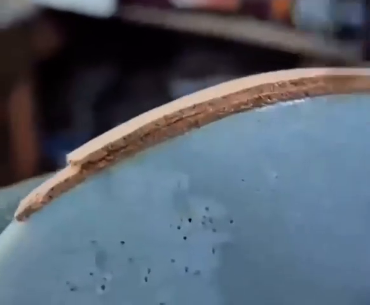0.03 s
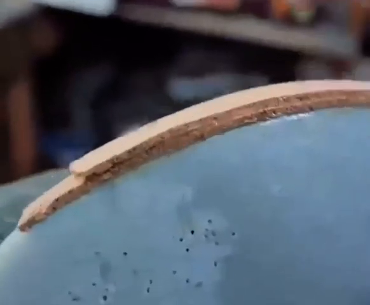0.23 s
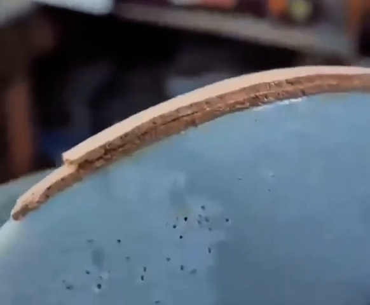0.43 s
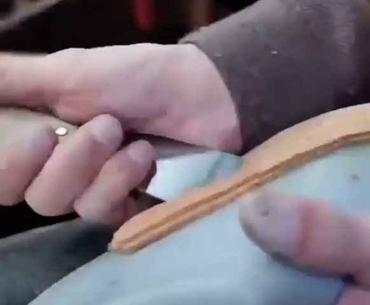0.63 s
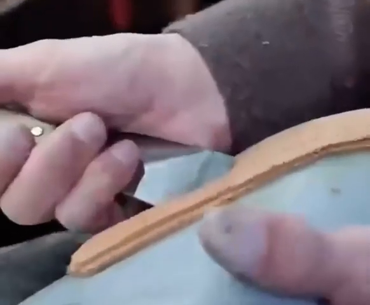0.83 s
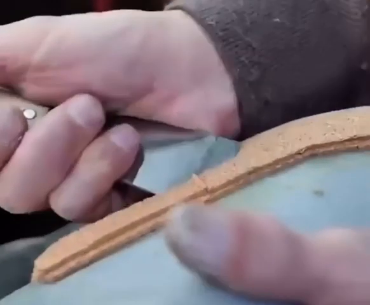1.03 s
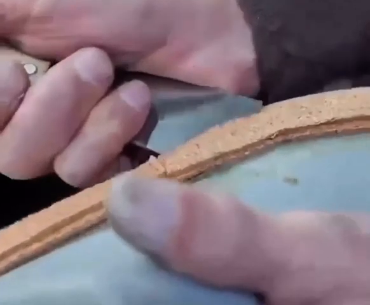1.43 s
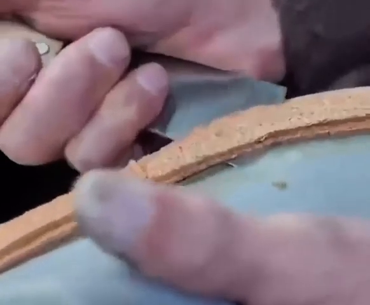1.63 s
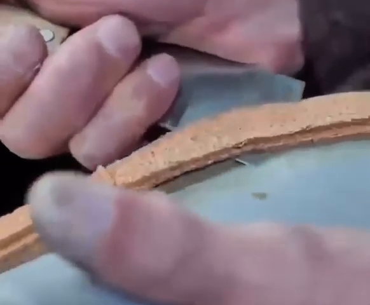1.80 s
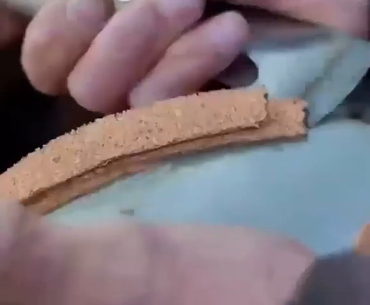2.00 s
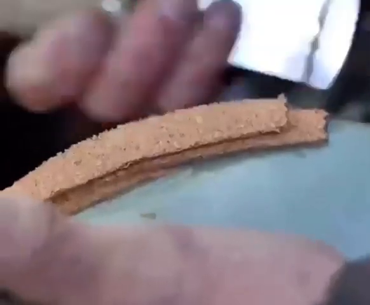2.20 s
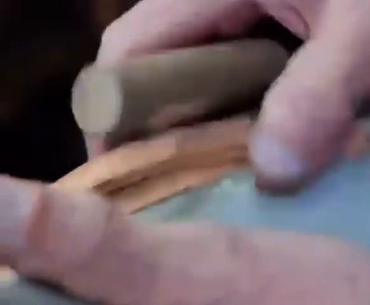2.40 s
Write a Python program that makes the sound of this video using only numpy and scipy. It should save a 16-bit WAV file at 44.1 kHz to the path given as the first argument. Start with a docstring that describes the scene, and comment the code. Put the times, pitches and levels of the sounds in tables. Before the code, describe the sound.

A hammer thuds twice on a cork strip glued to a plastic shoe form. A knife then crunches softly through the strip in uneven pushes, and the offcut peels away and snaps, close up in a small workshop.

```python
"""Hammering and trimming a strip on a shoe form

Two close hammer blows excite the damped modes of a plastic shoe form with a strip glued to it.
A knife crunches through the strip in uneven pushes, each tiny fracture ringing blade and strip, and
slips out; the offcut peels away and snaps. In the small workshop a low hum wavers over quiet noise."""
import sys
import numpy as np
from scipy import signal
from scipy.fft import rfft, irfft
from scipy.io import wavfile
from scipy.ndimage import uniform_filter1d

SR = 44100
rng = np.random.default_rng(int(sys.argv[2]) if len(sys.argv) > 2 else 0)


def file_out(sig):
    """Save sig as 16-bit WAV at sys.argv[1]."""
    # one column per channel
    cols = np.atleast_2d(sig).T
    # limit, then scale
    lim = np.clip(cols, -1, 1)
    pcm = np.round(lim * 32767).astype(np.int16)
    wavfile.write(sys.argv[1], SR, pcm)


N = 112454


def amp(db):
    """Amplitude ratio of a level in decibels."""
    return 10 ** (np.asarray(db) / 20)


def unit(x):
    """Normalisation to an rms of 1."""
    return x / np.sqrt(np.mean(x ** 2))


def clock():
    """Time of each sample in seconds."""
    return np.arange(N) / SR


def curve(rows):
    """Amplitude envelope through (s, dB) points, silent outside them."""
    s, db = np.array(rows).T
    return amp(np.interp(clock(), s, db, left=-120, right=-120))


def fade(start, t60):
    """Free decay: a sudden onset, then a fall of 60 dB every t60 seconds."""
    age = clock() - start
    return (age >= 0) * np.exp(-np.log(1000) * np.maximum(age, 0) / t60)


def colour(x, points):
    """Minimum-phase filter through (Hz, dB) points that conserves the power of white noise."""
    hz, db = np.array(points).T
    log_hz = np.log(np.fft.rfftfreq(2 * N, 1 / SR) + 1)
    log_gain = np.log(amp(np.interp(log_hz, np.log(hz), db)))
    cepstrum = irfft(log_gain)[:N]
    cepstrum[1:] *= 2
    response = np.exp(rfft(cepstrum, 2 * N))
    rms_gain = np.sqrt(np.mean(abs(response) ** 2))
    return irfft(rfft(x, 2 * N) * response / rms_gain)[:N]


def band(x, hz, width):
    """Two identical resonators in cascade, for steep skirts."""
    b, a = signal.iirpeak(min(hz, .45 * SR), hz / width, fs=SR)
    return signal.lfilter(b, a, signal.lfilter(b, a, x + 1e-18))


def ring(x, peaks):
    """Parallel resonances (centre Hz, width Hz, dB) that conserve the power of white noise."""
    impulse = signal.unit_impulse(2048)
    response = sum(amp(db) * band(impulse, hz, width) for hz, width, db in peaks)
    return signal.fftconvolve(x, response / np.linalg.norm(response))[:N]


def walk(rate_hz):
    """Slow random fluctuation: low-passed noise with an rms of 1."""
    span = int(SR / rate_hz)
    return unit(uniform_filter1d(uniform_filter1d(rng.standard_normal(N), span), span))


def grains(per_s, spread_db):
    """Tiny fractures as a Poisson process of impulses, mostly small, a few large."""
    hit = rng.random(N) < per_s / SR
    size = amp(spread_db * np.minimum(rng.exponential(size=N), 5))
    return unit(hit * size * rng.choice([-1, 1], N))


def burst(start, t60, click_db=10.5):
    """Broadband excitation: an impulse with a decaying tail of noise."""
    click = np.arange(N) == int(start * SR)
    return amp(click_db) * click + fade(start, t60) * rng.standard_normal(N)


def hammer():
    """Impact excitation: the form thuds in its damped modes, and the steel face cracks on contact."""
    # Each row: start in seconds, thud level in dB, crack level in dB, crack centre in Hz.
    blows = [(.2148, 1.5, -16.5, 6960), (.482, 2.4, -13, 4020)]
    # Modes of the form. Each row: frequency in Hz, level in dB, t60 in seconds.
    form_modes = [(131, 12.5, 0.012), (234.4, 13, 0.016), (332.3, 13.5, .015), (396.3, 7, 0.023),
                  (566.3, 10, .01), (740, -15.5, 0.038), (806, -33, 0.1), (945, -27.5, .055),
                  (1357, -19.5, 0.029), (1603, -12, 0.022), (2357, -8, 0.0088)]
    rise_s, crack_lead_s, crack_width_hz = 0.0022, .0002, 5000
    t, out = clock(), 0
    for start, db, crack_db, crack_hz in blows:
        push = 1 - np.exp(-np.maximum(t - start, 0) / rise_s)
        thud = sum(amp(mode_db) * fade(start, t60) * np.sin(2 * np.pi * hz * (t - start))
                   for hz, mode_db, t60 in form_modes)
        crack = ring(burst(start - crack_lead_s, t60=0.012), [(crack_hz, crack_width_hz, 0)])
        out = out + amp(db) * push * thud + amp(crack_db) * crack
    return out


def knife():
    """Fracture and friction: breaking grains ring the juddering blade and the strip; the flank hisses."""
    # Envelopes of crunch, lower ring and hiss. Each row: time in seconds, level in dB.
    crunch_levels = [(0.55, -80), (0.568, -58), (0.594, -53.5), (0.608, -50.5), (0.638, -57.5),
                     (0.808, -51), (0.986, -57), (1.034, -66), (1.132, -54), (1.25, -59.5), (1.26, -58),
                     (1.358, -63.5), (1.372, -55), (1.558, -47), (1.574, -57.5), (1.702, -59), (1.726, -47),
                     (1.74, -52.5), (1.936, -59), (1.946, -48.5), (1.996, -74), (2.054, -57.5),
                     (2.196, -69), (2.21, -65), (2.236, -82), (2.31, -86)]
    low_levels = [(0.55, -65), (0.936, -59.5), (1.05, -66.5), (1.128, -59.5), (1.368, -67), (1.446, -50),
                  (1.692, -63), (1.726, -50), (1.868, -60.5), (1.96, -49), (2.03, -88), (2.044, -54),
                  (2.182, -91), (2.31, -76.5)]
    hiss_levels = [(0.55, -70), (0.588, -54.5), (0.98, -59.5), (1.014, -67), (1.088, -66), (1.112, -56),
                   (1.318, -64), (1.358, -83), (1.372, -60), (1.524, -54), (1.578, -62.5), (1.696, -60),
                   (1.716, -54), (1.932, -60.5), (1.952, -44), (2.0, -76), (2.128, -62.5), (2.192, -72),
                   (2.21, -66), (2.31, -86)]
    # Hard spots give way. Each row: start in seconds, ring in dB, hiss in dB, t60 in seconds.
    catches = [(0.802, -51, -48.5, 0.021), (.9075, -44, -55.5, 0.025), (.944, -43.5, -55, 0.04),
               (1.26, -47.5, -60, 0.047), (1.375, -40, -65, 0.0067), (1.513, -41.5, -43.5, .02),
               (1.541, -36.5, -42, 0.012), (1.723, -43.5, -60, 0.014), (1.9458, -36, -38, 0.0047),
               (1.952, -55, -41, 0.0077), (2.208, -54.5, -69.5, 0.028)]
    # Resonances of blade and strip. Each row: centre in Hz, width in Hz, level in dB.
    shallow_peaks = [(2370, 340, -0.5), (2837, 600, 8.5), (3067, 380, -1.5), (3290, 460, -10),
                     (4020, 360, -10)]
    deep_peaks = [(2590, 460, -9), (2800, 650, 1), (3107, 1000, -6.5), (3410, 130, -10), (3820, 470, -11)]
    low_peaks = [(422, 510, -2), (780, 1300, -16.5), (1375, 258, 4), (1510, 120, -14)]
    # Spectrum of the hiss. Each row: frequency in Hz, spectral density in dB.
    hiss_spectrum = [(1500, 3), (3500, 2), (5200, 9), (6200, 6.5), (7300, 12.5), (8200, 9.5), (9200, 11),
                     (10400, 7), (11200, 7), (13500, 3), (15500, -1)]
    judder_db, sheen_hz, sheen_width_hz = 2.3, 10300, 680
    sink_start_s, sink_time_s = 0.96, 0.41
    judder = unit(amp(judder_db * walk(rate_hz=52)))
    fractures = grains(per_s=3100, spread_db=3.5) * judder
    crunch = amp(-1.5) * curve(crunch_levels) * fractures
    low = amp(-0.5) * curve(low_levels) * fractures
    hiss = amp(-1.5) * curve(hiss_levels) * grains(per_s=9000, spread_db=3) * np.sqrt(judder)
    for start, ring_db, hiss_db, t60 in catches:
        tick = burst(start, t60)
        crunch += amp(ring_db) * tick
        low += amp(ring_db - 4.5) * tick
        hiss += amp(hiss_db) * tick
    # As the blade sinks in, its resonances shift and it loses its bright sheen.
    depth = np.clip((clock() - sink_start_s) / sink_time_s, 0, 1)
    sheen = amp(-13) * ring(hiss, [(sheen_hz, sheen_width_hz, 0)])
    shallow = np.sqrt(1 - depth) * (ring(crunch, shallow_peaks) + sheen)
    deep = np.sqrt(depth) * ring(crunch, deep_peaks)
    return shallow + deep + ring(low, low_peaks) + colour(hiss, hiss_spectrum)


def offcut():
    """Failure under tension: the strip rasps as it peels, squeaks as it stretches, and its fibres snap."""
    # Envelopes of rasp and squeak, and the single snaps. Each row: time in seconds, level in dB.
    rasp_levels = [(2.315, -74.5), (2.329, -47), (2.355, -49.5), (2.375, -55), (2.427, -46.5),
                   (2.455, -34.5), (2.479, -51), (2.517, -59), (2.55, -67)]
    squeak_levels = [(2.42, -60), (2.436, -65), (2.44, -37.5), (2.449, -38), (2.456, -64), (2.47, -59)]
    fibre_snaps = [(2.4534, -17.5), (2.4552, -32), (2.4578, -20.5)]
    # Spectra of rasp and snap. Each row: frequency in Hz, spectral density in dB.
    rasp_spectrum = [(200, -4), (600, 1), (1000, 1), (1500, 7.5), (2100, -3), (3200, 6.5), (4200, -3),
                     (5200, 0), (6500, -3), (8700, 0), (10500, -8), (15000, -10)]
    snap_spectrum = [(150, -17), (450, 1), (900, 7), (1100, 2), (1400, 18), (2100, -4), (3100, 10),
                     (4000, -13), (5200, -27), (9000, -41), (15000, -37)]
    # Resonances of the stretched strip. Each row: centre in Hz, width in Hz, level in dB.
    strip_peaks = [(1370, 140, 0), (1610, 170, 4.5), (3470, 250, 7), (4900, 750, -6), (8820, 170, 2.5)]
    rasp = amp(-2) * curve(rasp_levels) * grains(per_s=7500, spread_db=2.6)
    squeak = curve(squeak_levels) * ring(rng.standard_normal(N), strip_peaks)
    snaps = sum(amp(db) * burst(start, t60=0.01) for start, db in fibre_snaps)
    return colour(rasp, rasp_spectrum) + squeak + colour(snaps, snap_spectrum)


def handling():
    """Contact noise: hand and knife knock on the form, it rumbles when pushed, and an arm rustles."""
    # Single knocks, and envelopes of rumble and rustle. Each row: time in seconds, level in dB.
    contacts = [(1.9068, -36), (2.0465, -35), (2.3315, -45), (2.4652, -30.5), (2.5055, -37)]
    rumble_levels = [(.55, -45), (.62, -35), (.74, -41), (.85, -41.5), (1.1, -44.5), (1.3, -41.5),
                     (1.7, -46), (1.85, -36.5), (1.95, -43)]
    rustle_levels = [(0, -53.5), (.06, -61), (.13, -66), (.2, -69), (.3, -62.5), (.42, -75), (.55, -82)]
    # Spectrum of a knock. Each row: frequency in Hz, spectral density in dB.
    knock_spectrum = [(100, 3.5), (400, 4), (750, 5.5), (1300, -11), (2000, -12.5), (3000, -14),
                      (5000, -23), (10000, -24.5), (15000, -39)]
    rustle_hz, rustle_width_hz = 3150, 4200
    knocks = sum(amp(db) * burst(start, t60=0.016) for start, db in contacts)
    rumble = curve(rumble_levels) * unit(band(rng.standard_normal(N), hz=47.5, width=44.5))
    rustle = curve(rustle_levels) * ring(rng.standard_normal(N), [(rustle_hz, rustle_width_hz, 0)])
    return colour(knocks, knock_spectrum) + rumble + rustle


def room(x):
    """Reverberation: the diffuse field of the workshop builds up, then decays at a rate set by octave."""
    # Each row: band centre in Hz, level in dB, t60 in seconds.
    octaves = [(103, -20.5, 0.14), (237, -16, 0.2), (488, -19, .18), (990, -19.5, 0.18), (2040, -18, 0.091),
               (3770, -15.5, 0.086), (6700, -18, 0.098), (12000, -23, 0.028)]
    delay_s, build_s = 0.0036, 0.004
    age = np.maximum(clock() - delay_s, 0)
    tail = 0
    for hz, db, t60 in octaves:
        edges = [hz / np.sqrt(2), min(hz * np.sqrt(2), .45 * SR)]
        bandpass = signal.butter(3, edges, "band", fs=SR, output="sos")
        noise = signal.sosfilt(bandpass, rng.standard_normal(N))
        envelope = fade(delay_s, t60) * (1 - np.exp(-age / build_s))
        tail = tail + amp(db) * noise * envelope / np.linalg.norm(envelope)
    return signal.fftconvolve(x, tail)[:N]


def lingering_ring(hz=281, width_hz=259):
    """Reverberant decay: at the start the room still rings from an earlier blow."""
    return amp(-31.5) * ring(burst(0, t60=0.15), [(hz, width_hz, 0)])


def hum():
    """A low tone modulated in frequency and amplitude, with a faint band of noise above it."""
    # Each row: time in seconds, frequency in Hz.
    pitches = [(0, 88.5), (.45, 86.5), (.62, 76), (.84, 71), (.96, 98.5), (1.07, 84.5), (1.22, 91),
               (1.32, 70.5), (1.42, 86), (1.5, 78), (1.6, 95.5), (1.73, 84), (1.81, 68), (1.9, 92.5),
               (2.2, 89), (2.55, 89.5)]
    # Each row: time in seconds, level in dB.
    levels = [(0, -50), (.1, -38), (.14, -42), (.18, -38.5), (.3, -43), (.45, -39), (.62, -43.5),
              (.74, -41.5), (.83, -40), (.92, -43), (.99, -30.5), (1.08, -31.5), (1.13, -42.5), (1.19, -48),
              (1.23, -25.5), (1.29, -36), (1.42, -36), (1.48, -43.5), (1.54, -29), (1.6, -38.5),
              (1.64, -30.5), (1.75, -32.5), (1.79, -44.5), (2.05, -43.5), (2.42, -42.5), (2.49, -36),
              (2.55, -40)]
    hz = np.interp(clock(), *np.array(pitches).T) * (1 + 0.021 * walk(rate_hz=60))
    phase = 2 * np.pi * np.cumsum(hz) / SR
    tone = amp(-1.5) * curve(levels) * np.sqrt(2) * np.sin(phase)
    overtone = amp(-53) * unit(band(rng.standard_normal(N), hz=134, width=52))
    return tone + overtone


def background():
    """Ambient noise: steady machine tones over a continuous spectrum whose level flickers slightly."""
    # Each row: frequency in Hz, rms level in dB.
    machine_tones = [(599, -71.5), (720, -71), (840, -70)]
    # Room noise. Each row: frequency in Hz, spectral density in dB.
    noise_spectrum = [(20, -14.5), (45, -4), (80, 1), (160, -4.5), (260, -15), (480, -22.5), (780, -24),
                      (1050, -27.5), (2000, -34), (3300, -33), (4500, -43), (8500, -43.5), (15000, -51)]
    tones = sum(amp(db) * np.sqrt(2) * np.sin(2 * np.pi * hz * clock()) for hz, db in machine_tones)
    noise = amp(-48 + walk(rate_hz=18)) * colour(rng.standard_normal(N), noise_spectrum)
    return tones + noise


def scene():
    """Superposition of the sources at the bench, their reverberation and the background, in mono."""
    work = knife() + offcut() + handling()
    blows = hammer()
    reverberation = room(blows) + lingering_ring() + amp(-2) * room(work)
    return (blows + work + reverberation + hum() + background())[None]


def record(dry):
    """Band limiting and saturation: the microphone thins deep bass, overloads on blows, cuts the top."""
    low_cut_hz, ceiling, top_hz = 6.4, .9, 15600
    thinned = signal.sosfilt(signal.butter(1, low_cut_hz, "high", fs=SR, output="sos"), dry)
    clipped = thinned / (1 + (thinned / ceiling) ** 8) ** (1 / 8)
    return signal.sosfilt(signal.ellip(8, .2, 70, top_hz, fs=SR, output="sos"), clipped)


dry = scene()
out = record(dry)
file_out(out)
```